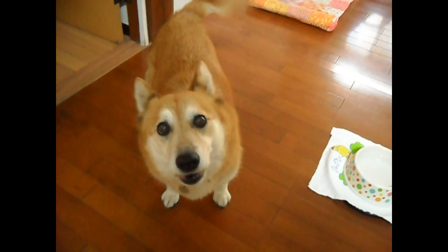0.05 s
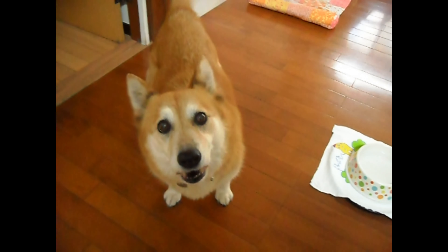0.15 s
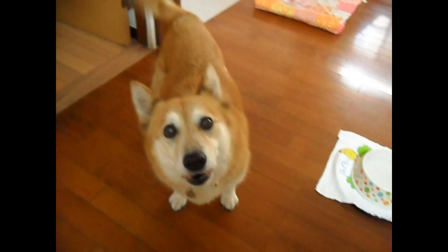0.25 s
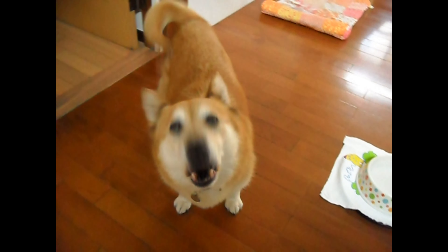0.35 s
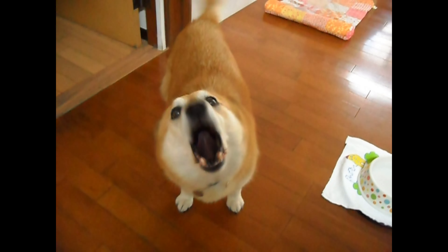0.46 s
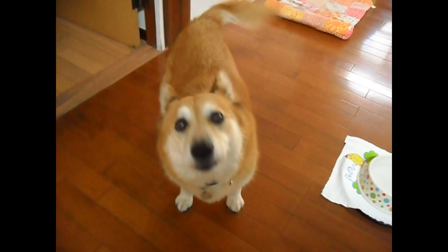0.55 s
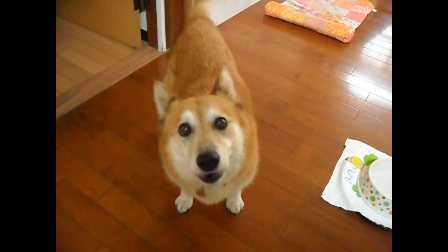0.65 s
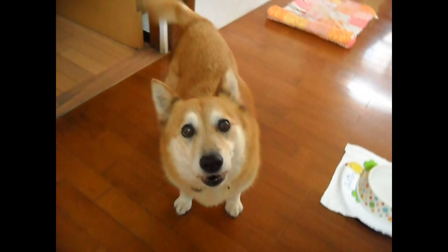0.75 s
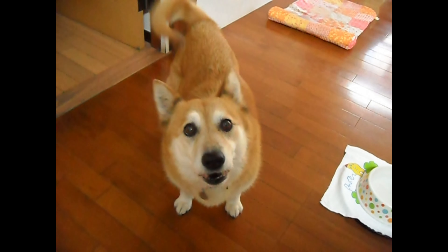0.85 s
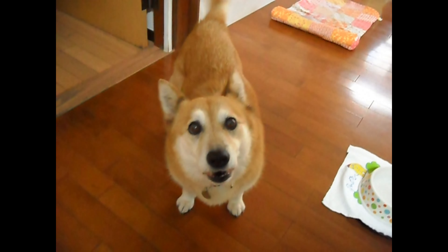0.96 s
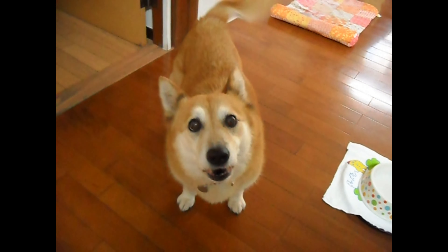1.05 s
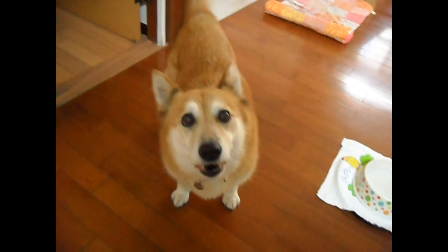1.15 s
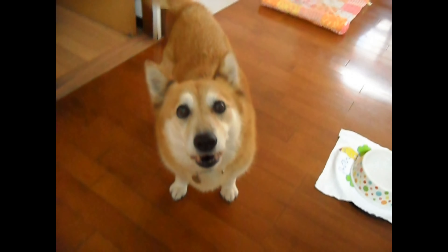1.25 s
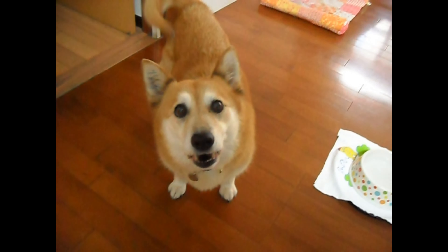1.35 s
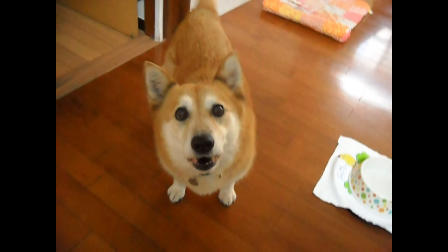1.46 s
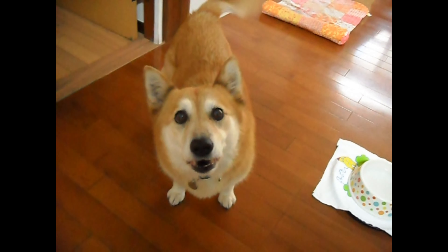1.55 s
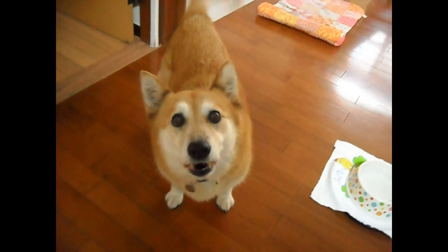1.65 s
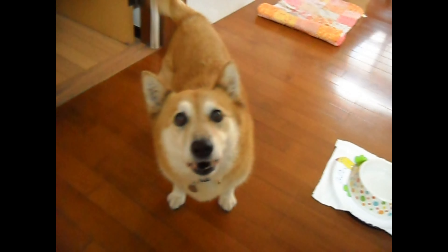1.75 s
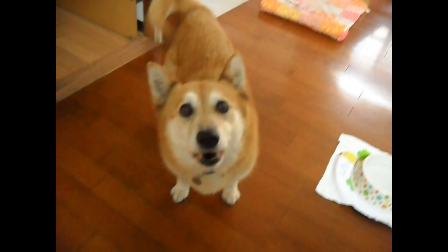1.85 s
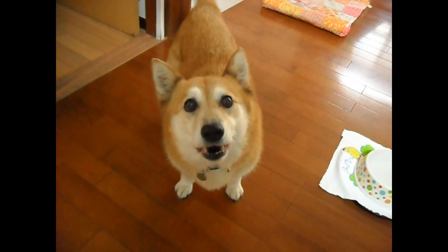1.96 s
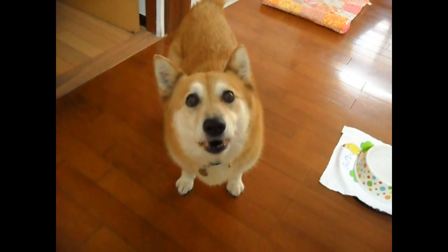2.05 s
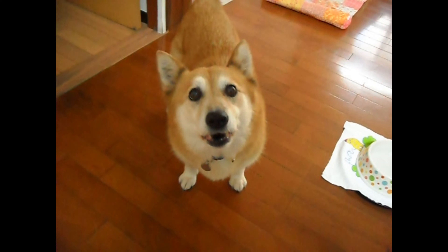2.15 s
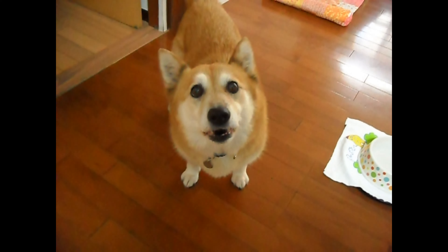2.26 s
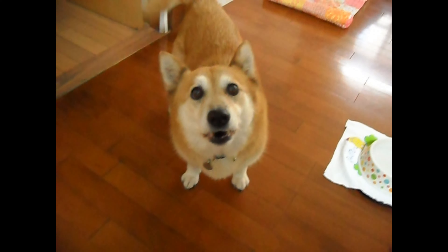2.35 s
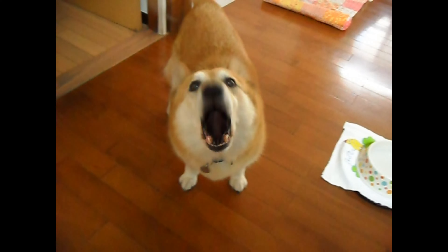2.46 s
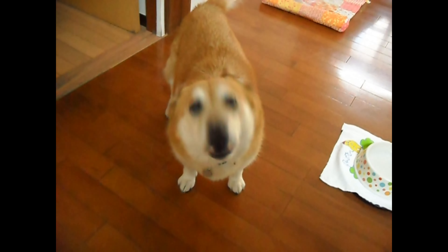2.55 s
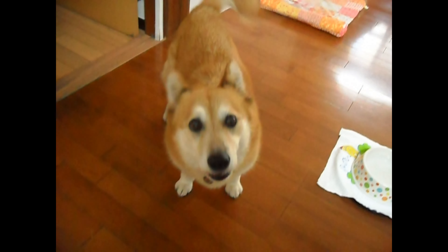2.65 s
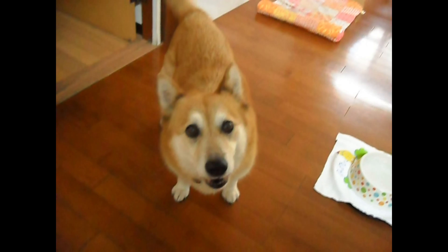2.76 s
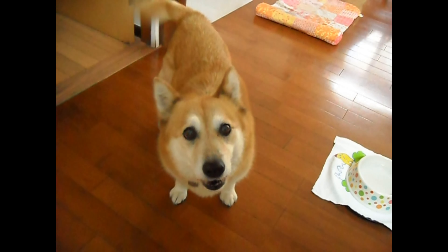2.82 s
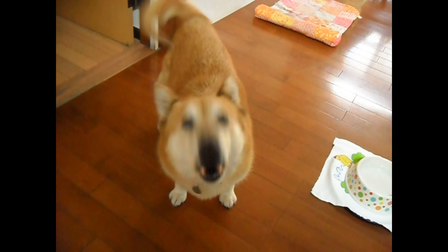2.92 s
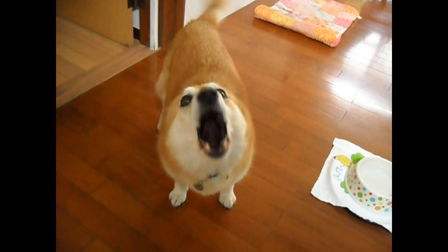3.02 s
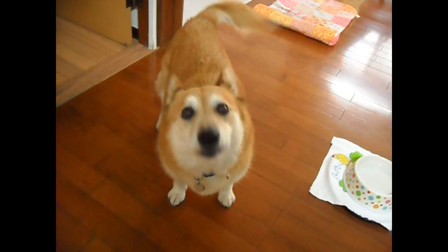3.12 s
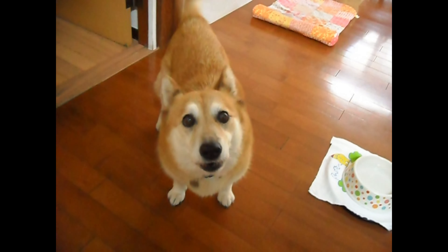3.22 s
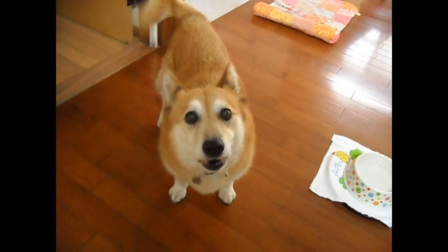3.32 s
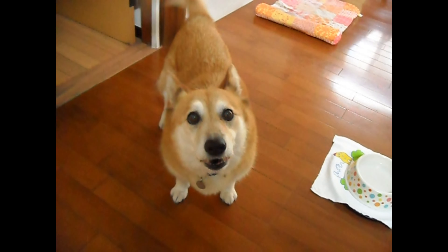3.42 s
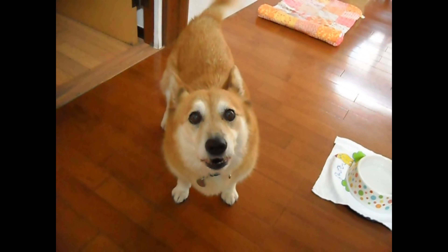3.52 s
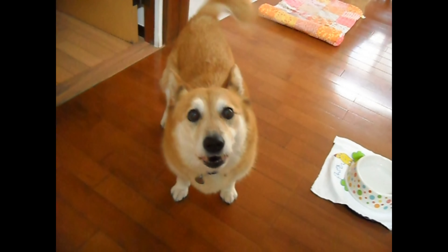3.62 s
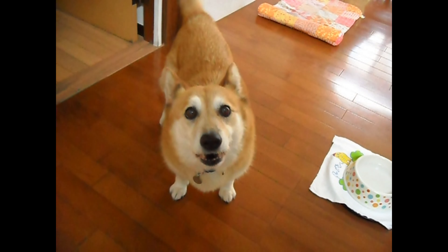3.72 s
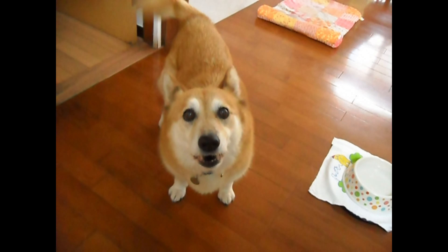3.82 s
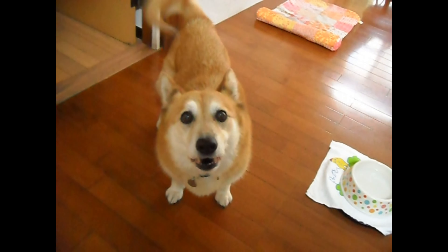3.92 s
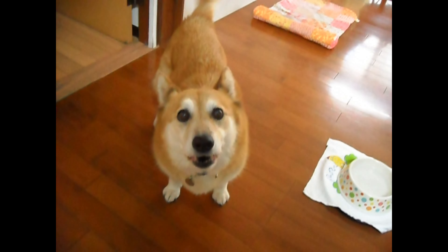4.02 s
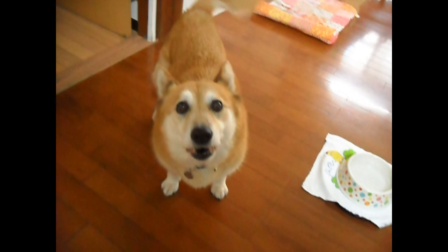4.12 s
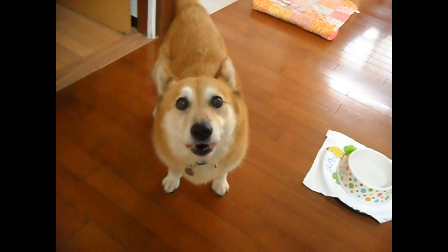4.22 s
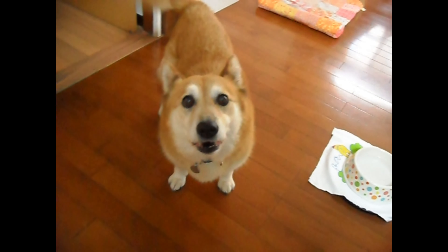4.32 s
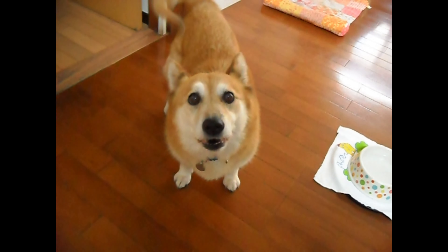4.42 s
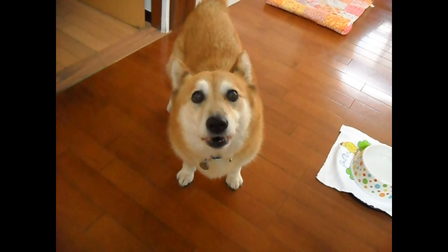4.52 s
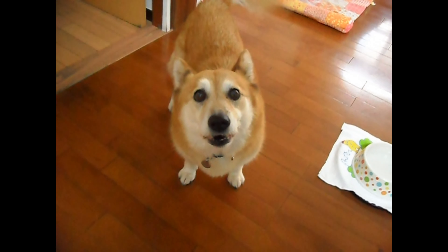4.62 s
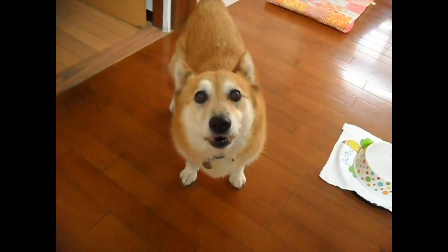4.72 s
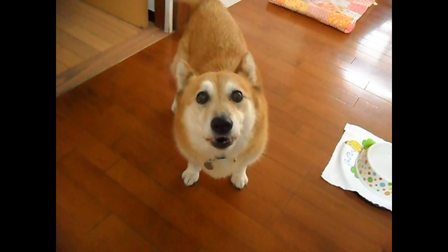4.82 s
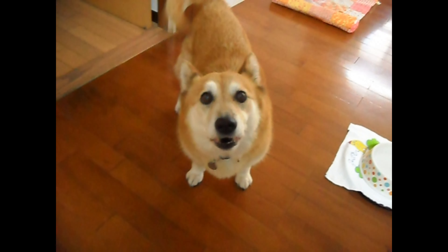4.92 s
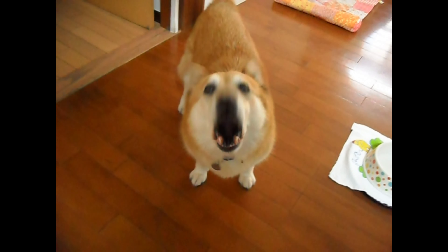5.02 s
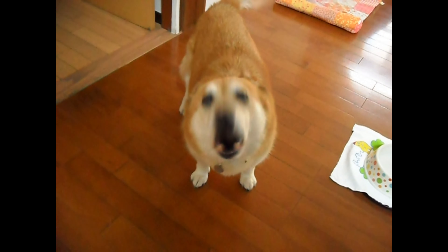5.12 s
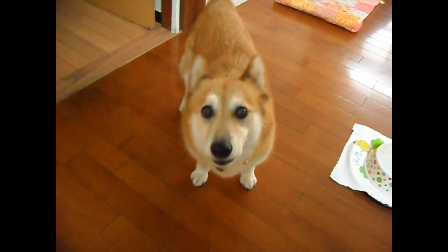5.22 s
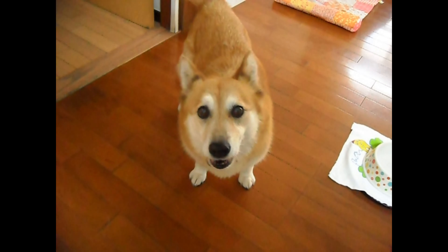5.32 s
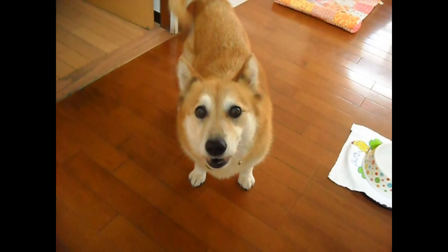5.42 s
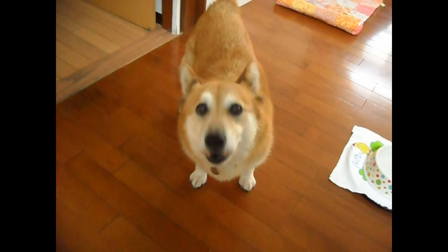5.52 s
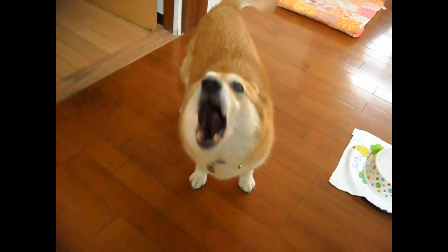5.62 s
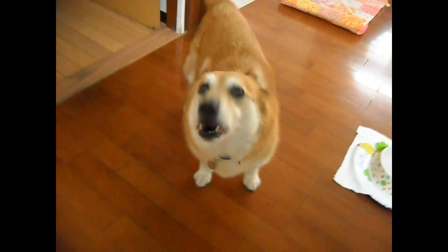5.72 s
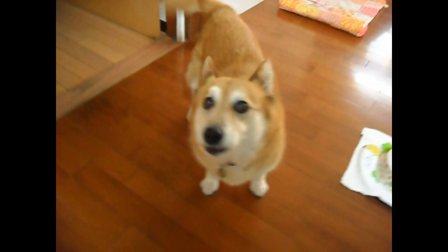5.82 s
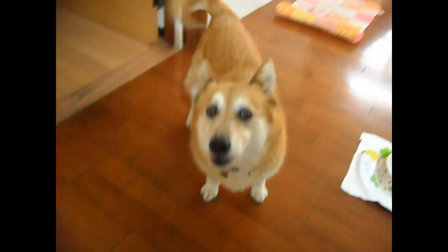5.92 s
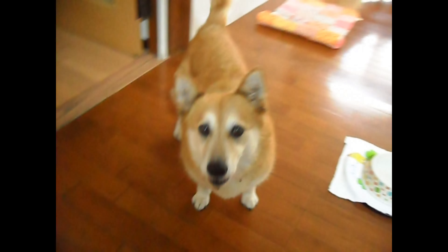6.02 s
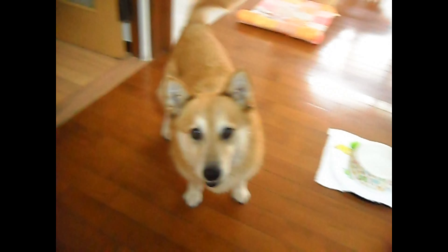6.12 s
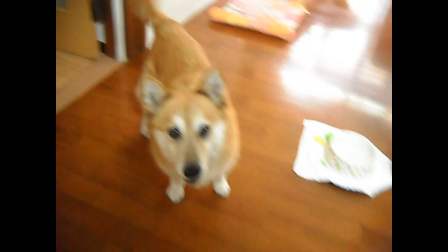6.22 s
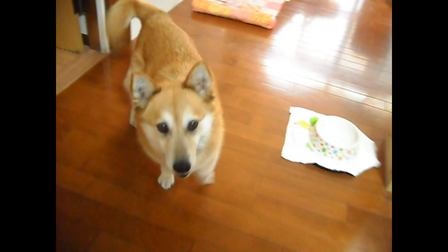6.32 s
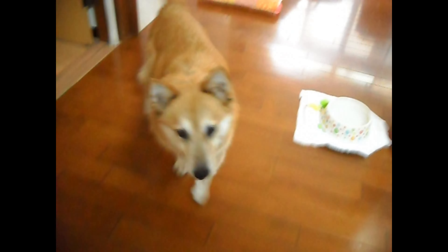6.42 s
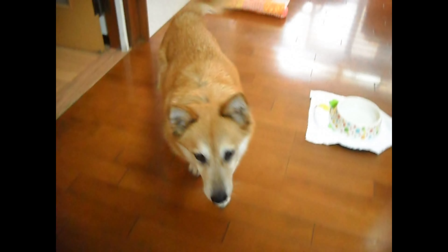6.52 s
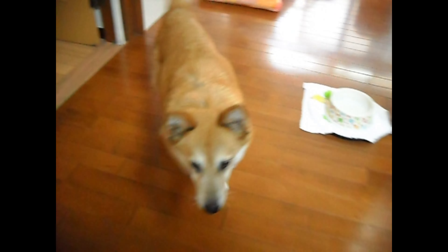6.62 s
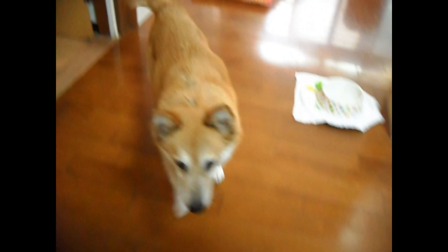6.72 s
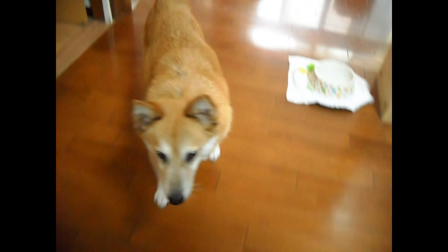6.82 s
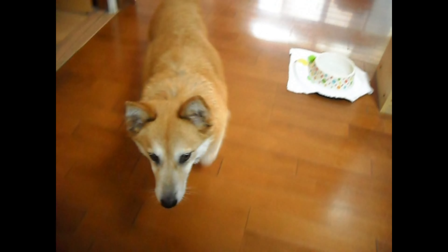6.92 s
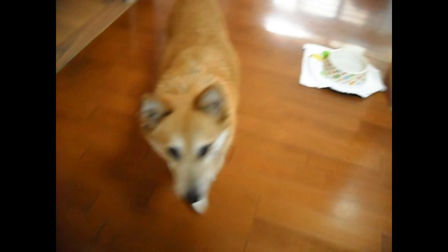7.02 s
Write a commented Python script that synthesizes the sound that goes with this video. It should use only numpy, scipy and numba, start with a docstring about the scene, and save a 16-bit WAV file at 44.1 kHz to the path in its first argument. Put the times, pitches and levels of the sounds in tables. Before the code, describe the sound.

A dog close to a hand-held microphone in a living room. The tail of one bark opens, then a loud arching bark. Quiet follows with tiny collar ticks and dull bumps, then a faint growl rising into two quick barks. After a pause a nasal whine sinks into two more barks. It ends on barely audible whimpers and soft thumps over hiss.

```python
"""In a living room with a wooden floor, a dog begs close to a hand-held camera.
Rough, arching barks come from noisy vocal folds through an open throat; whines, whimpers and a growl pass a closed muzzle.
Collar tags and claws tick as short ringing modes; paws and the hand thump dully over hiss and handling rumble.
The room adds early echoes and a tail; the recorder's gain steps down with a crackle on loud peaks."""
import sys
import numpy as np
from scipy import signal
from scipy.fft import rfft, irfft, next_fast_len
from scipy.io import wavfile
from scipy.ndimage import uniform_filter1d
from numba import njit

SR = 44100
rng = np.random.default_rng(int(sys.argv[2]) if len(sys.argv) > 2 else 0)


def bounce(signal):
    """Save signal as a 16-bit WAV file at the path given by the first command-line argument."""
    frames = np.transpose(np.atleast_2d(signal))
    limited = np.clip(frames, -1, 1)
    pcm = np.round(limited * 32767).astype(np.int16)
    wavfile.write(sys.argv[1], SR, pcm)


N = 311775  # length in samples

# Barks, each with two pushes of breath; efforts are before the bark trim:
# pitch leap t/s, attack t/s, leap to top t/s, swell t/s, fall t/s, pitch after leap f/Hz, top pitch f/Hz,
# effort level/dB at first push, in hold, at top, in fall; roughness 0-1 of first push, of the rest;
# mouth opening as upper over lower band level/dB (before tilt) at first push, in fall
BARK_EVENTS = [(-.13, 0.0374, 0.1, .03, 0.039, 580, 690, -19, -22.5, -21, -31, 0.42, 0.384, 2.5, -6.5),
               (.381, 0.0371, .136, 0.065, .027, 575, 779.7, -11.5, -21, -10, -16, 0.17, 0.3214, 5.5, -5),
               (2.431, 0.03932, .1, .02, 0.0473, 658, 636, -10, -18.5, -22, -16.5, .18, .05, 1.5, 6),
               (2.93, 0.0356, 0.11235, .03, 0.03997, 544.8, 725.1, -18, -23, -17, -23.5, .36, 0.368, -0.5, 1.5),
               (5.025, .043, 0.10956, .025, .042, 600, 719.5, -12, -19.5, -14.5, -13.5, .15, 0.33, 0.5, 1),
               (5.572, 0.03847, .114, .035, .028, 542, 813.7, -17.5, -22, -12.5, -22.5, 0.25, 0.302, 1, 2)]
# Resonances of the throat with the mouth open: centre f/Hz, width f/Hz, relative level/dB
OPEN_THROAT = [(225.2, 130, -21.5), (470, 200, -3), (652.8, 130, -2.5), (869.15, 260, 5),
               (1111.1, 250, -0.5), (1404.2, 270, -17), (1638, 250, -21), (1875.7, 260, -23.5),
               (2285, 500, -33), (3200, 340, -42.5), (3600, 400, -46), (4430, 600, -55),
               (6535, 1500, -64.5)]


def barks():
    """Open-mouthed barks: the pitch leaps up, roughens with noise and drops away."""
    # one second of lead-in, as a bark is already under way at the start
    out = np.zeros(SR + N)
    for row in BARK_EVENTS:
        # closing is the share of bare fundamental at the end of a bark
        start_s, bark = voice(bark_course(*row), OPEN_THROAT, jitter=.07, flutter_hz=129.6, rasp=1.05,
                              air=0.22, tilt_db=-0.2338, closing=.4)
        add(out, start_s + 1, bark)
    return out * amp(-3.0)


# timing: start before the leap, first push after it, easing off, end after the top, time the mouth takes to open
LEAD_S, PUSH_S, EASE_S, END_S, OPEN_S = .065, .025, 0.02, .098, .026
# pitch of slack folds; how fast they tighten; how late in the hold the pitch climbs (power of time)
SLACK_HZ, LEAP_S, CLIMB_POWER = 204.94, .016, 2.6
# steepness of the attack (power of time); sinking time to the grunt, its first and last effort
ATTACK_POWER, RELEASE_S, GRUNT_DB, GRUNT_END_DB = 3.0, 0.025, -35.5, -43
FALL_SHARE = .52  # the last push comes this share of the fall time after the top
ROUGH_START, ROUGH_END = .45, .15  # 0-1, as the folds start and stop
# mouth opening before tilt
MOUTH_START_DB, MOUTH_HOLD_DB, MOUTH_TOP_DB, MOUTH_END_DB = -19.5, -4.5, -11.5, -6


def bark_course(s, attack_s, top_s, swell_s, fall_s, leap_hz, top_hz, push_db, hold_db, top_db, fall_db,
                rough_push, rough_rest, open_db, reopen_db):
    """Fold tension and breath shape one bark: a leap, an easier hold, a squeeze to the top and a fall."""
    t = np.arange(-LEAD_S, top_s + END_S, 1 / 1000)
    end = t[-1]
    eased = PUSH_S + EASE_S
    last_push = top_s + FALL_SHARE * fall_s
    grunt = last_push + RELEASE_S

    climb = np.clip(t / top_s, 0, 1) ** CLIMB_POWER
    taut_hz = leap_hz + (top_hz - leap_hz) * climb
    tightening = 1 / (1 + np.exp(-t / LEAP_S))
    slackening = 1 + (np.maximum(t - top_s, 0) / fall_s) ** 2
    hz = SLACK_HZ + tightening / slackening * (taut_hz - SLACK_HZ)

    effort_db = np.interp(t, [PUSH_S, eased, max(eased, top_s - swell_s), top_s, last_push, grunt, end],
                          [push_db, hold_db, hold_db, top_db, fall_db, GRUNT_DB, GRUNT_END_DB])
    before_push = np.maximum(PUSH_S - t, 0) / attack_s
    effort_db -= 20 * np.log10(np.e) * before_push ** ATTACK_POWER

    rough = np.interp(t, [-OPEN_S, 0, PUSH_S, eased, grunt, end],
                      [ROUGH_START, rough_push, rough_push, rough_rest, rough_rest, ROUGH_END])
    mouth_db = np.interp(t, [-OPEN_S, 0, PUSH_S, eased, top_s, last_push, end],
                         [MOUTH_START_DB, open_db, open_db, MOUTH_HOLD_DB, MOUTH_TOP_DB, reopen_db, MOUTH_END_DB])
    return np.column_stack([s + t, hz, effort_db, rough, mouth_db])


MOUTH_HZ = 880  # split between the lower band and the upper band that the mouth lets out


def voice(rows, tract, jitter, flutter_hz, rasp, air, tilt_db, closing):
    """Vocal folds, unsteady when rough, and puffs of air sound through the throat and mouth."""
    s, *columns = np.transpose(rows)
    t = np.arange(s[0], s[-1], 1 / SR)
    hz, effort_db, rough, mouth_db = (np.interp(t, s, c) for c in columns)
    rough, n = np.clip(rough, 0, .9), len(t)

    turns = np.cumsum(hz * (1 + jitter * rough * wander(n, flutter_hz))) / SR
    # 24 harmonics, muted above a quarter of the sample rate
    folds = evened(sum(np.cos(2 * np.pi * k * turns) * (k * hz < SR / 4) for k in range(1, 25)))
    # strong and weak cycles alternate, which puts half lines between the harmonics
    folds *= 1 + rasp * rough * wander(n, 40) * np.cos(np.pi * turns)
    # air noise bursts out at the start of each cycle
    puffs = evened((air + np.exp(-(turns % 1) / 0.18)) * rng.standard_normal(n))

    def throat(f):
        return sum(amp(db) / (1 + ((f - centre) / width) ** 2) ** 4 for centre, width, db in tract)

    def upper(f):
        return 1 - 1 / (1 + (f / MOUTH_HZ) ** 10)

    # turbulence smears the upper harmonics more than the fundamental
    low = steadied(rung(folds + 1.2 * rough * puffs, lambda f: throat(f) * (1 - upper(f))))
    high = steadied(rung(folds + 1.6 * rough * puffs, lambda f: throat(f) * upper(f)))
    # lips and tongue never hold still, so the overtones come and go
    opening = amp(mouth_db + tilt_db + 1.5 * wander(n, 16))
    sound = (low + opening * high) / np.sqrt(1 + opening ** 2)

    # as the jaws shut, the bare falling fundamental takes over in part
    top_s = t[np.argmax(hz)]
    shut = closing * np.clip(2 * (t - top_s) / (t[-1] - top_s + 1 / SR) - .5, 0, 1)
    fundamental = np.sqrt(2) * np.cos(2 * np.pi * turns)
    sound = (1 - shut) * sound + shut * fundamental
    fade = np.clip(np.minimum(t - t[0], t[-1] - t) / 0.0046, 0, 1)
    return s[0], amp(effort_db) * fade * sound


# Resonances with the muzzle closed: centre f/Hz, width f/Hz, relative level/dB
CLOSED_MUZZLE = [(113.7, 18, 7), (235, 72, 2), (308, 50, 2), (480, 170, 3), (650.6, 130, -2),
                 (865.6, 160, -10.5), (1183, 140, -19.5), (1483, 280, -37), (2086, 330, -44)]
# A growl that rises into a whine before a bark; levels before the whine trim and tilt:
# t/s, pitch f/Hz, effort level/dB, mouth opening level/dB
GROWL_CURVE = [(2.09, 114.8, -69.5, -12.5), (2.142, 114.6, -54.5, -24.5), (2.202, 115.1, -53.5, -20.5),
               (2.232, 127.6, -61.5, -24.5), (2.26, 219.2, -59.5, -21.5), (2.29, 276.7, -53, -27),
               (2.32, 314.6, -44.5, -31), (2.348, 290.6, -45.5, -19), (2.39, 298.8, -48, -19.5)]
# A long whine that sinks before a bark; columns as for the growl
WHINE_CURVE = [(4.14, 215, -79, -11.5), (4.168, 262, -58, -29), (4.238, 332.4, -72.5, -25),
               (4.282, 435, -58, -5.5), (4.366, 482.5, -49.5, -26), (4.522, 502.2, -38, -21),
               (4.594, 445.3, -46, -1), (4.694, 360.7, -43.5, -10), (4.736, 267.9, -35, -31.5),
               (4.762, 223.3, -42.5, -9), (4.868, 225.6, -41.5, -11), (4.9, 195.5, -38, -30.5),
               (4.92, 162.8, -41.5, -15), (4.966, 166.3, -39.5, -18), (4.99, 179.6, -38, -26)]
# Faint whimpers, mostly rising; levels before the whine trim and tilt: t/s, length t/s, first pitch f/Hz,
# last pitch f/Hz, mid-whimper effort level/dB, roughness 0-1, mouth opening level/dB
WHIMPER_EVENTS = [(3.759, 0.128, 443, 664, -65, 0.01, -20), (6.069, 0.0652, 501.4, 563.3, -59, 0.08, -30.5),
                  (6.14, 0.095, 584.4, 650, -64.5, 0.58, -23), (6.27, 0.0945, 583, 607, -65, 0.61, -21.5),
                  (6.428, 0.082, 679, 712, -65, .35, -12), (6.938, 0.134, 660.6, 628.5, -63, .7, -1)]


def whines():
    """The folds sound through the closed muzzle as a growl, a long whine and nasal whimpers."""
    out = np.zeros(N)
    courses = [whine_course(GROWL_CURVE), whine_course(WHINE_CURVE)]
    courses += [whimper_course(*row) for row in WHIMPER_EVENTS]
    for rows in courses:
        start_s, whine = voice(rows, CLOSED_MUZZLE, jitter=.14, flutter_hz=61.3, rasp=0.54, air=0.31,
                               tilt_db=-2.0, closing=0)
        add(out, start_s, whine)
    return out * amp(-0.26)


# slack folds rattle: roughness 0-1 of a high whine, and what is added at the pitch of a growl
ROUGH_WHINE, ROUGH_GROWL, GROWL_HZ = 0.053, 0.37, 115


def whine_course(curve):
    """The folds slacken at low pitch, so a whine is rougher the nearer it lies to a growl."""
    s, hz, effort_db, mouth_db = np.transpose(curve)
    rough = ROUGH_WHINE + ROUGH_GROWL * (GROWL_HZ / hz) ** 4
    return np.column_stack([s, hz, effort_db, rough, mouth_db])


WHIMPER_ARCH_DB = 12  # swell and fade of a whimper


def whimper_course(s, length, first_hz, last_hz, db, rough, mouth_db):
    """A whimper swells and fades while its pitch bends away ever faster."""
    u = np.linspace(0, 1, 20)
    hz = first_hz + (last_hz - first_hz) * u ** 2
    effort_db = db - WHIMPER_ARCH_DB * (2 * u - 1) ** 2
    same = np.ones(len(u))
    return np.column_stack([s + u * length, hz, effort_db, rough * same, mouth_db * same])


# Ticks of collar tags and claws: t/s, peak level/dB before the tick trim and room
TICK_EVENTS = [(1.1208, -58.5), (1.1622, -54.5), (1.1797, -56), (1.2431, -57), (1.2592, -49), (1.28, -40),
               (1.3053, -52.5), (1.4315, -56), (1.4665, -60), (1.7975, -57)]
# Modes the ticks ring with, before each tick's random detuning and strength: f/Hz, relative level/dB, t60 t/s
TAG_MODES = [(1314, 3.5, 0.015), (2400, -2, 0.028), (2905, 7.5, 0.012), (3470, 3.5, 0.021),
             (3770, -25.5, .04), (4220, -21, 0.042), (5660, -30, 0.042), (7300, -33, .03)]


def ticks():
    """Each strike rings the same few modes, a little detuned and with other strengths, plus a short scrape."""
    out, t = np.zeros(N), np.arange(SR // 10) / SR
    for s, db in TICK_EVENTS:
        ring = np.zeros(len(t))
        for hz, level, t60 in TAG_MODES:
            decay = amp(level - 60 * t / t60) * rng.uniform(0.27, 1.6)
            ring += decay * np.sin(2 * np.pi * hz * rng.uniform(0.9, 0.96) * t)
        hiss = shaped(rng.standard_normal(len(t)), lambda f: 1 / (1 + ((f - 3300) / 2000) ** 4))
        scrape = hiss * np.exp(-t / 0.0038)
        tick = ring + 3.5 * scrape
        add(out, s, amp(db + 2.5) * tick / abs(tick).max())
    return out


# Soft thumps of paws and of the hand on the camera: t/s, envelope peak level/dB, swell t/s (peak at twice this)
THUMP_EVENTS = [(0.483, -39.5, 0.00337), (.949, -51, 0.01616), (1.121, -53, 0.00354), (1.219, -48, 0.00048),
                (1.277, -41.5, 0.00334), (1.411, -49.5, 0.0029), (1.57, -54, 0.0084),
                (1.796, -50, 0.000582), (1.971, -52, 0.00214), (2.388, -46, 0.0071), (4.036, -54, 0.00093),
                (6.378, -58.5, 0.0041), (6.501, -56, 0.00293), (6.601, -49, 0.00833), (6.963, -49, 0.00776)]
# pitch a slow thump tends to; a blow as short as SHARP_S sounds an octave higher
THUMP_HZ, SHARP_S = 120.8, 0.00086


def thumps():
    """Dull pushes swell and die away with a little scuff; the shorter, the higher."""
    out, t = np.zeros(N), np.arange(SR // 4) / SR
    for s, db, swell in THUMP_EVENTS:
        u = t / swell
        hz = THUMP_HZ * (1 + (SHARP_S / swell) ** 2)
        scuff = 0.31 * wander(len(t), 267) + 0.19 * wander(len(t), 1000)
        body = np.sin(2 * np.pi * hz * t) + scuff
        envelope = (u / 2) ** 2 * np.exp(2 - u)
        add(out, s, amp(db) * body * envelope)
    return out


# Colour of the steady hiss: f/Hz, relative level/dB per Hz
HISS_COLOUR = [(100, 1.5), (300, -4.5), (700, -6.5), (1200, -12), (2500, -15.5), (5000, -18.5),
               (10000, -22)]
HISS_DB = -72
# Colour of the handling rumble: f/Hz, relative level/dB per Hz
RUMBLE_COLOUR = [(10, -2), (28, 1.5), (50, -10), (90, -12.5), (150, -21.5), (300, -28), (800, -54.5),
                 (3000, -93.5)]
# Course of the rumble before its trim and random drift: t/s, level/dB
RUMBLE_COURSE = [(0.0, -73), (0.53, -57), (0.59, -71), (1.02, -59.5), (1.26, -62.5), (1.28, -50.5),
                 (1.5, -63.5), (2.56, -62), (2.6, -71), (5.12, -67), (5.32, -72), (5.73, -58), (6.0, -73),
                 (6.5, -59.5), (6.93, -70.5), (6.99, -61.5), (7.07, -73)]


def background():
    """Coloured noise makes an even hiss and the lumpy rumble of the hand that holds the camera."""
    t = np.arange(N) / SR
    hiss, rumble = (evened(shaped(rng.standard_normal(N), lambda f: amp(read(colour, f))))
                    for colour in (HISS_COLOUR, RUMBLE_COLOUR))
    course_db = np.interp(t, *np.transpose(RUMBLE_COURSE))
    rumble *= amp(course_db + 2.5 * wander(N, 23) + 2.5)
    return amp(HISS_DB) * hiss + rumble


# Decay of the room's tail: f/Hz, t60 t/s
ROOM_DECAY = [(200, 0.12), (530, 0.39), (900, 0.546), (1400, 0.39), (3700, 0.48), (8000, 0.66)]


def room(x, early_db, tail_db):
    """A quick cluster of echoes from floor and walls, then a tail that dies by band."""
    # one echo of random sign at a random place in every 20 samples
    taps = np.zeros(SR)
    at = np.arange(130, SR - 20, 20)
    taps[at + rng.integers(0, 20, len(at))] = rng.choice([-1., 1.], len(at))
    hz, t, z = signal.stft(taps, SR, nperseg=256)
    decay = amp(-60 * t / read(ROOM_DECAY, hz)[:, None])
    tail = signal.istft(z * decay, SR, nperseg=256)[1][:SR]
    early = taps[::-1] * np.exp(-np.arange(SR) / SR / 0.015)
    echoes = amp(early_db) * early / np.linalg.norm(early) + amp(tail_db) * tail / np.linalg.norm(tail)
    return x + signal.fftconvolve(x, echoes)[:len(x)]


def amp(db):
    """Level in dB to amplitude."""
    return 10 ** (np.asarray(db) / 20)


def evened(x):
    """Scales x to an RMS of one."""
    return x / np.sqrt(np.mean(x ** 2) + 1e-20)


def steadied(x, size=900):
    """Holds the short-time power near one."""
    return x / np.sqrt(abs(uniform_filter1d(x ** 2, size)) + 1e-12)


def read(points, hz):
    """Reads a curve of values over log frequency."""
    f, value = np.transpose(points)
    return np.interp(np.log(hz + 1), np.log(f + 1), value)


def add(mix, s, sound):
    """Lays a sound into the mix at s seconds."""
    part = mix[max(0, round(s * SR)):][:len(sound)]
    part += sound[:len(part)]


def shaped(x, gain):
    """Filters x by a gain that is a function of frequency."""
    n = next_fast_len(len(x) + 2048)
    return irfft(rfft(x, n) * gain(np.fft.rfftfreq(n, 1 / SR)), n)[:len(x)]


def wander(n, hz):
    """Random drift of unit RMS, rolled off steeply above hz."""
    return evened(shaped(rng.standard_normal(n), lambda f: 1 / (1 + (f / hz) ** 4)))


def rung(x, gain):
    """Minimum-phase filter: each resonance rings on after the pulse that strikes it."""
    n = 2 * next_fast_len(len(x) // 2 + 2048)
    log_gain = np.log(gain(abs(np.fft.fftfreq(n, 1 / SR))) + 1e-5)
    response = np.exp(np.conj(signal.hilbert(log_gain)))
    return irfft(rfft(x, n) * response[:n // 2 + 1], n)[:len(x)]


def scene():
    """The dog in its room over the background; the barks excite the room most."""
    loud = room(barks(), early_db=-7.5, tail_db=-5)[SR:]  # drops the lead-in
    soft = room(whines(), early_db=-11.5, tail_db=-7.5)
    collar = room(ticks(), early_db=-11.5, tail_db=-21.5)
    return (loud + soft + collar + thumps() + background())[None]


@njit
def stepped_gain(x, ceiling, step, recovery, holds):
    """The gain clicks down a step when the wave tops the ceiling, rests before the next, and always creeps up."""
    out, gain, wait = np.zeros(len(x)), 1.0, 0.0
    for i in range(len(x)):
        wait -= 1
        if abs(x[i]) * gain > ceiling and wait <= 0:
            gain, wait = gain * step, holds[i]
        gain = min(1.0, gain * recovery)
        out[i] = x[i] * gain
    return out


EDGE_HZ = 10700  # upper band limit


def record(dry):
    """Stepping gain control with uneven rests between its steps, then the band limit."""
    ceiling, step_db, recovery_db_per_s, mean_hold_s = .29, -.9, 2.6, .011
    holds = SR * mean_hold_s * rng.exponential(1, N)
    held = stepped_gain(dry[0], ceiling, float(amp(step_db)), float(amp(recovery_db_per_s / SR)), holds)
    lowpass = signal.firwin(301, EDGE_HZ, window=("kaiser", 8), fs=SR)
    return signal.oaconvolve(held, lowpass, "same")[None]


dry = scene()
out = record(dry)
bounce(out)
```